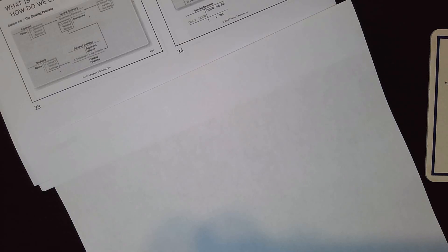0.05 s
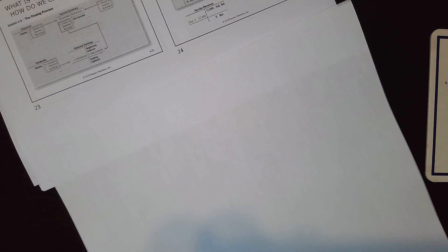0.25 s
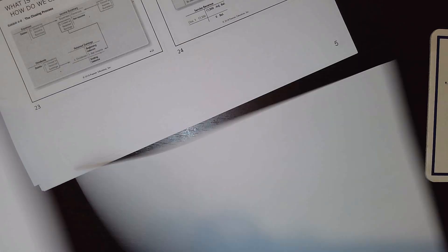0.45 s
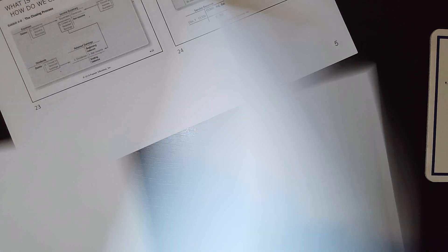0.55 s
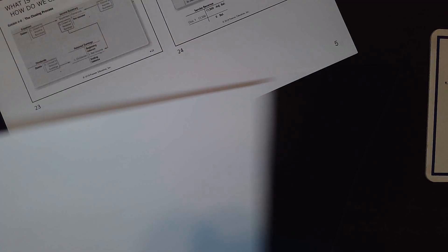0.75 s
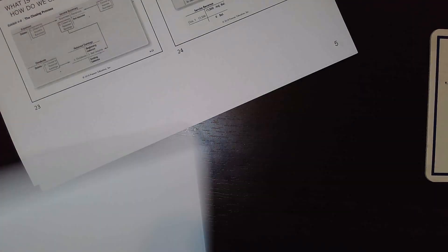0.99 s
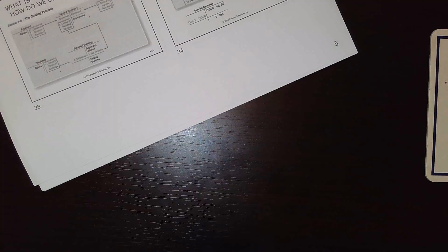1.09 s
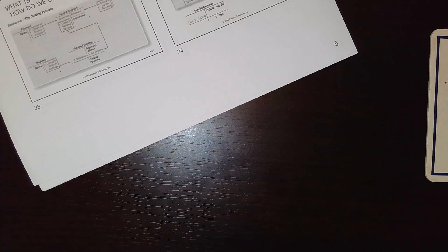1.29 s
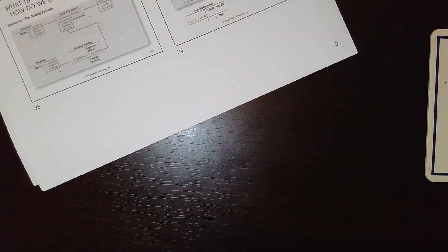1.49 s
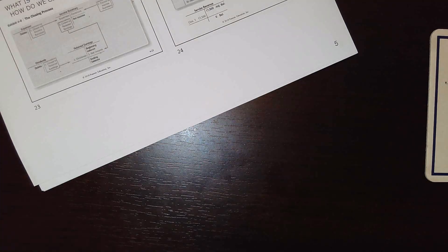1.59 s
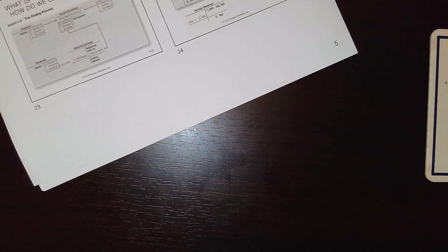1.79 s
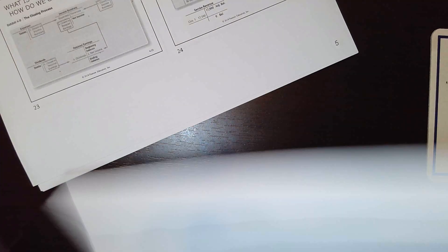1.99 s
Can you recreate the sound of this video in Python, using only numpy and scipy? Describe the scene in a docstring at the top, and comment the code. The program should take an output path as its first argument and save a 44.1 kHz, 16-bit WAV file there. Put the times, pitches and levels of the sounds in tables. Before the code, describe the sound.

Paper sheets rustle and slide across a wooden desk, with one very loud sharp snap early on.

```python
"""Sheets of paper are lifted, slid and set down on a wooden desk, close to a small microphone in a quiet room.
It starts with faint rustles and small snaps; at 0.2 s the hiss grows, and a very loud snap follows at 0.45 s.
Another snap and knock come at 0.54 s, then softer sliding, a snap at 1.12 s and a strong burst near 1.45 s.
After that the rustling fades to scattered small sounds. Filtered noise makes the friction hiss, the rustle
and the room; decaying sine tones make the snaps of the buckling paper, the desk knocks and the soft thumps."""
import sys
import numpy as np
from scipy import signal
from scipy.fft import rfft, irfft
from scipy.io import wavfile
from scipy.ndimage import uniform_filter1d

SR = 44100
rng = np.random.default_rng(int(sys.argv[2]) if len(sys.argv) > 2 else 0)


def unload_audio(sound):
    """Save the sound as a 16-bit wav file, at the path given as the first command line argument."""
    columns = np.transpose(np.atleast_2d(sound))
    # keep every value between -1 and 1, then stretch to whole-number steps
    steps = np.round(np.clip(columns, -1, 1) * 32767)
    wavfile.write(sys.argv[1], SR, steps.astype(np.int16))


N = 90404


def amp(db):
    """Turns decibels into a plain multiplier."""
    return 10 ** (np.asarray(db) / 20)


def evened(x):
    """Scales a signal to an average (RMS) strength of 1."""
    return x / np.sqrt(np.mean(x ** 2) + 1e-20)


def read(points, hz):
    """Reads a table between its points, along a logarithmic pitch scale."""
    f, value = np.transpose(points)
    return np.interp(np.log(hz + 1), np.log(f + 1), value)


def add(mix, s, sound):
    """Mixes a sound in, starting at s seconds."""
    part = mix[round(s * SR):][:len(sound)]
    part += sound[:len(part)]


def colour(x, spectrum):
    """Filters by a spectrum table, falling away steeply below its first point, and evens the strength."""
    hz = np.fft.rfftfreq(len(x), 1 / SR)
    low_cut = np.minimum(hz / spectrum[0][0], 1) ** 2
    return evened(irfft(rfft(x) * amp(read(spectrum, hz)) * low_cut, len(x)))


def grains(per_s, spread_db):
    """Dense tiny slips of random sign; a few are large."""
    size = amp(spread_db * np.minimum(rng.exponential(1, N), 4))
    happens = rng.random(N) < per_s / SR
    return size * rng.standard_normal(N) * happens


# How the paper is handled, one list per stretch. Each row: time in seconds, level of the sliding hiss in dB,
# its top end in dB (TOP_REF_DB is neutral), level of the duller flexing rustle in dB,
# rumble through the desk in dB before RUMBLE_DB is added.
STROKES = [
    [(0.0, -78, -6, -77, -70), (0.01, -83, -7, -70, -75), (0.018, -51.5, -7, -57, -72),
     (0.046, -56, -6, -66, -66), (0.058, -56.5, -9, -58, -64), (0.12, -55, -5.5, -62.5, -61),
     (0.148, -50, -8.5, -73, -46), (0.156, -49.5, -3, -52.5, -46), (0.18, -45.5, -5.5, -65, -48),
     (0.2, -43.5, -4, -59, -54)],
    [(0.22, -44.5, -4, -46.5, -32), (0.24, -37, -10, -32.5, -40), (0.25, -41, -6.5, -42, -37),
     (0.272, -43, -7, -46.5, -46), (0.29, -36, -5.5, -44, -47), (0.31, -48, -7.5, -49.5, -48),
     (0.332, -46.5, -8.5, -61, -43), (0.358, -45, -9.5, -55, -69), (0.388, -41, -8.5, -50.5, -44),
     (0.44, -40.5, -9, -52, -60)],
    [(0.465, -33, -8, -40, -50), (0.481, -41.5, -8, -35, -43), (0.525, -45.5, -9, -39.5, -44)],
    [(0.548, -34.5, -13, -27.5, -33.5), (0.59, -54.5, -12, -41.5, -42), (0.606, -64, -27, -40.5, -42),
     (0.624, -49.5, -7.5, -43, -52), (0.66, -52, -10, -51, -69), (0.67, -40.5, -6.5, -52, -53),
     (0.702, -32.5, -6.5, -50, -56), (0.718, -42, -9, -66, -45), (0.752, -45, -8.5, -52.5, -40),
     (0.8, -44.5, -7, -55, -46)],
    [(0.81, -51.5, -9, -63, -52), (0.858, -55.5, -8.5, -56, -62), (0.894, -54, -8, -62, -75),
     (0.966, -65, -5, -57, -55), (0.996, -51.5, -6, -81, -66), (1.036, -51.5, -4, -79, -65),
     (1.058, -56.5, -3, -53, -40), (1.076, -54, -8, -61, -48), (1.092, -37, -11.5, -44, -38),
     (1.108, -41.5, -8.5, -54, -60)],
    [(1.128, -37.5, -3, -36.5, -50), (1.146, -44.5, -10, -49, -48), (1.156, -43.5, -6, -43, -42),
     (1.17, -46, -8, -51.5, -43.5), (1.264, -68, -8, -63, -70), (1.318, -65, -7, -66, -62),
     (1.332, -52, -6, -58, -70), (1.34, -56.5, -7, -74, -72), (1.374, -60.5, -9, -80, -73),
     (1.418, -60, -11, -83, -59.5)],
    [(1.434, -37.5, -6, -38, -38), (1.452, -16, -7, -28, -33), (1.46, -29.5, -9, -36, -28),
     (1.496, -31.5, -7, -43.5, -45), (1.55, -42.5, -8.5, -47, -51.5), (1.572, -35.5, -6.5, -47.5, -56),
     (1.602, -43.5, -7.5, -56, -45), (1.67, -48, -6, -53.5, -45), (1.688, -49.5, -4, -70, -64),
     (1.72, -49, -4.5, -52, -73)],
    [(1.745, -56, -3, -63, -70), (1.753, -54, -8, -46, -70), (1.767, -79, 0, -78, -55),
     (1.823, -83, -6, -75, -66), (1.833, -54.5, 4, -55.5, -61), (1.849, -80, 0, -66, -55),
     (1.857, -59, -4, -55.5, -59), (1.871, -68, -2, -54.5, -49), (1.917, -69, -2, -64.5, -60),
     (1.93, -84, -10, -65, -54)],
    [(1.948, -49, -9, -58, -38), (1.962, -53, -3, -58, -50), (1.974, -45, -5, -63, -48),
     (1.978, -50, -5, -70, -54), (1.99, -47.5, -5.5, -62, -53), (2.018, -51.5, -5, -57.5, -46),
     (2.026, -50, -7, -75, -60), (2.05, -68.5, -3, -56, -59)],
]
# Each number: time in seconds where one stretch gives way at once to the next.
CONTACTS = [0.2124, 0.454, 0.5385, .805, 1.1182, 1.4291, 1.733, 1.9388]


def handling():
    """Joins the stretches: each level holds until the contact that starts the next."""
    rows = list(STROKES[0])
    for s, stroke in zip(CONTACTS, STROKES[1:]):
        rows.append((s - .001, *rows[-1][1:]))
        rows.append((s, *stroke[0][1:]))
        rows += list(stroke)
    return np.array(rows).T


# Colour of the sliding hiss. Each row: frequency in Hz, relative strength in dB per Hz.
HISS = [(880, -51), (1500, -6.5), (1580, -28.5), (2050, -9), (2620, -10.5), (2830, -3.5), (3470, -4),
        (5040, 1), (8960, 3.5), (15500, -4)]
GRAINS_PER_S, GRAIN_DB = 25000, 1.  # how many slips, and how much their sizes spread
# The tilt turns about a point near TOP_HZ; TOP_SLOPE is dB per octave for each dB of top end.
TOP_HZ, TOP_REF_DB, TOP_SLOPE = 8330, -6.5, 2.01
PATCH_DB, FLUTTER_DB = 1, 1.94  # random unevenness: in patches of time and pitch, and of the whole hiss


def friction_hiss(s, hiss_db, top_db):
    """Fibres catch on the surface below in countless tiny slips, making a bright, uneven hiss."""
    slips = colour(grains(GRAINS_PER_S, GRAIN_DB), HISS)
    hz, t, z = signal.stft(slips, SR, nperseg=256, noverlap=192)
    patches = rng.standard_normal(z.shape)
    patches = uniform_filter1d(patches, size=6, axis=0)  # smooth over pitch
    patches = evened(uniform_filter1d(patches, size=14, axis=1))  # smooth over time
    flutter = evened(uniform_filter1d(rng.standard_normal(len(t)), size=4))
    octaves = np.log2((hz + 500) / TOP_HZ)[:, None]
    tilt = octaves * TOP_SLOPE * (np.interp(t, s, top_db) - TOP_REF_DB)
    z = z * amp(np.clip(tilt, -15, 15) + PATCH_DB * patches + FLUTTER_DB * flutter)
    uneven = signal.istft(z, SR, nperseg=256, noverlap=192)[1][:N]
    return uneven * amp(np.interp(np.arange(N) / SR, s, hiss_db))


# Colour of the flexing rustle. Each row: frequency in Hz, relative strength in dB per Hz.
FLEX = [(150, -88), (250, 5), (393, -1.5), (544, 6), (792, 1.5), (1450, 4), (1930, 5), (3650, -1),
        (5000, -13.5), (6500, -12), (11000, -120)]
FLEX_PER_S, FLEX_GRAIN_DB = 9000, 1.2  # how many slips, and how much their sizes spread


def flexing_rustle(s, flex_db):
    """The flexing sheet gives a duller rustle, made of sparser tiny slips."""
    rustle = colour(grains(FLEX_PER_S, FLEX_GRAIN_DB), FLEX)
    return rustle * amp(np.interp(np.arange(N) / SR, s, flex_db))


# Colour of the desk rumble. Each row: frequency in Hz, relative strength in dB per Hz.
RUMBLE = [(25, 3), (60, -3.5), (160, -2.5), (260, -17), (400, -24), (1000, -49)]
RUMBLE_DB = -6  # added to every rumble level


def desk_rumble(s, rumble_db):
    """Sliding shakes the desk: low noise follows the strokes."""
    rumble = colour(rng.standard_normal(N), RUMBLE)
    return rumble * amp(np.interp(np.arange(N) / SR, s, rumble_db) + RUMBLE_DB)


def sliding():
    """Friction hiss, flexing rustle and desk rumble all follow the same handling of the paper."""
    s, hiss_db, top_db, flex_db, rumble_db = handling()
    return friction_hiss(s, hiss_db, top_db) + flexing_rustle(s, flex_db) + desk_rumble(s, rumble_db)


# Snaps of the buckling sheet. Each row: start in seconds, peak in dB before SNAP_DB is added,
# centre of colour in Hz, spread in octaves, time in seconds for the crackle to fall by 60 dB.
SNAPS = [(0.019, -29.5, 6600, 0.93, 0.0023), (0.0275, -35, 7500, 1.1, 0.006),
         (0.0557, -36, 5670.0, 1.1, 0.0054), (0.0625, -35, 6360.0, 1, 0.006),
         (0.0684, -38.9, 6790.0, 0.79, 0.006), (0.0764, -40, 5330.0, 1.17, 0.0072),
         (0.0808, -46, 4930.0, 1.1, 0.0051), (0.213, -22.5, 1420.0, 1.4, 0.0091),
         (0.2265, -22.5, 2060, 1.48, 0.0042), (0.236, -20.5, 1520, 1.15, 0.0046),
         (0.2402, -29.5, 2730.0, 1.2, 0.006), (0.2595, -27, 3250, 1.2, 0.013),
         (0.2818, -20, 8270.0, 0.86, 0.0051), (0.2888, -21, 8200, 0.77, 0.0054),
         (0.43, -31, 4830.0, 1.35, 0.0072), (0.4541, 1.2, 5370, 1, 0.0078),
         (0.5379, -11.5, 2460, 0.91, 0.0063), (0.558, -18.3, 1790.0, 0.66, 0.0048),
         (0.9577, -46, 2040, 1.71, 0.0054), (1.0521, -36, 5160.0, 1.2, 0.0052),
         (1.0898, -27.5, 5050.0, 1.2, 0.0076), (1.119, -18.5, 6350, 1.16, 0.0044),
         (1.1199, -15, 5200, 1, 0.0067), (1.1274, -25.5, 4040.0, 1.7, 0.0082),
         (1.1529, -28.5, 3720, 1.3, 0.0079), (1.1625, -36, 4200.0, 1.64, 0.0051),
         (1.1827, -32, 2130, 1.8, 0.0051), (1.4309, -33, 3320.0, 1.1, 0.0046),
         (1.436, -25, 7340, 0.93, 0.0047), (1.4383, -9, 5200, 1.3, 0.0093),
         (1.446, -8.5, 8750, 0.65, 0.0039), (1.45, -13.5, 6200, 1.6, 0.012),
         (1.6505, -38.5, 2360, 2.2, 0.006), (1.731, -26.5, 2350, 0.96, 0.006),
         (1.7519, -39.5, 2720, 0.64, 0.0048), (1.8335, -40, 9460.0, 1.18, 0.0055),
         (1.8591, -27, 700.0, 0.47, 0.0051), (1.8711, -33.5, 860, 0.28, 0.018),
         (1.8791, -35, 1830, 0.2, 0.0079), (1.9413, -32.5, 2700.0, 2.1, 0.0021)]
# Tones the sheet briefly rings with. Each row: frequency in Hz, relative level in dB,
# time in seconds to fall by 60 dB.
SHEET = [(570, -1, 0.004), (945, -12.5, 0.0059), (1160, 0.5, 0.0075), (1620, -2, 0.0046),
         (2355, -1, 0.0057), (3770, -1, 0.0023), (4440, 2, 0.0033), (6660, 11, 0.0023), (8800, 1, 0.0042),
         (11430, 2.5, 0.0054), (14500, -22, .003)]
CLICK_SHARE, SNAP_DB = 3.82, -0.5  # size of the first click beside the crackle; level added to every snap


def snaps():
    """A click and a dying crackle ring the modes of the sheet near the centre of colour."""
    out, t = np.zeros(N), np.arange(3000) / SR
    noise = rng.standard_normal((len(SNAPS), len(t)))
    for (s, db, centre_hz, octaves, crackle_t60), crackle in zip(SNAPS, noise):
        ring = np.zeros(len(t))
        for k, (hz, mode_db, t60) in enumerate(SHEET):
            away = np.log2(hz / centre_hz) / max(octaves, .3)
            level = amp(mode_db - 10 * away ** 2 - 60 * t / t60)
            ring += (-1) ** k * level * np.sin(2 * np.pi * hz * t)
        drive = crackle * amp(-60 * t / max(crackle_t60, .001))
        drive[0] = CLICK_SHARE
        sound = signal.fftconvolve(drive, ring)[:len(t)]
        add(out, s, amp(db + SNAP_DB) * sound / abs(sound).max())
    return out


# Snaps that also knock the desk top. Each row: time in seconds, peak in dB, softness of the push in seconds.
KNOCKS = [(0.2124, -28, 0.00034), (.2267, -27.5, 0.0005), (0.2377, -26.5, 0.00029), (0.4538, -14, 0.00019),
          (0.5386, -12.5, 0.00015), (0.5473, -27, 0.00023), (1.052, -39.5, 0.00062),
          (1.1205, -30.5, 0.0003), (1.156, -35.5, 0.00047), (1.181, -41, 0.00041), (1.44, -34.5, 0.00049),
          (1.4521, -21.5, 0.00027), (1.653, -36.5, 0.00032), (1.877, -39, .0005), (1.886, -38, 0.00033),
          (1.9413, -36.5, 0.00033)]
# Tones of the desk top. Each row: frequency in Hz, relative level in dB, time in seconds to fall by 60 dB.
DESK = [(562, -7, 0.023), (687, -3, 0.012), (1117, 3.5, 0.017), (1355, 5.5, 0.014), (1705, 5.5, 0.035),
        (2360, -3, 0.012), (3700, -24, .012)]


def knocks():
    """A short rounded push rings the desk top; softer pushes favour its low modes."""
    out, t = np.zeros(N), np.arange(3000) / SR
    ring = np.zeros(len(t))
    for k, (hz, db, t60) in enumerate(DESK):
        ring += (-1) ** k * amp(db - 60 * t / t60) * np.sin(2 * np.pi * hz * t)
    for s, db, soft in KNOCKS:
        push = np.exp(-(t[:200] / soft - 2) ** 2)
        sound = signal.fftconvolve(push, ring)
        add(out, s - 2 * soft, amp(db) * sound / abs(sound).max())  # the push is strongest at s
    return out


# Soft thumps through the desk and puffs of air. Each row: start in seconds, level in dB of the swing
# before its rise and decay, pitch in Hz, time in seconds to fall by 60 dB.
THUMPS = [(0.149, -36, 40, .06), (.208, -29.5, 75, 0.1), (.236, -28, 80, 0.077), (.43, -30, 122, 0.062),
          (0.537, -43, 58.7, 0.066), (.708, -34.5, 150, 0.049), (1.054, -38, 45.3, 0.11),
          (1.165, -31.5, 40.2, .06), (1.45, -30.5, 73, 0.06), (1.5, -32.5, 34.8, 0.085),
          (1.574, -32.5, 50.3, 0.045), (1.649, -29.5, 78, 0.042), (1.855, -44, 90.5, 0.027)]
THUMP_RISE_S, THUMP_NOISE = 0.001, 0.22  # rise in seconds; share of rumble beside the swing


def thumps():
    """A low damped swing with a little rumble."""
    out, t = np.zeros(N), np.arange(12000) / SR
    noise = rng.standard_normal((len(THUMPS), len(t)))
    band = signal.butter(2, [40, 350], "band", fs=SR, output="sos")
    for (s, db, hz, t60), n in zip(THUMPS, noise):
        rumble = evened(signal.sosfilt(band, n))
        swing = -np.sin(2 * np.pi * hz * t)
        shape = (1 - np.exp(-t / THUMP_RISE_S)) * amp(db - 60 * t / max(t60, .01))
        add(out, s, shape * (swing + THUMP_NOISE * rumble))
    return out


# How long reflections last. Each row: frequency in Hz, time in seconds to fall by 60 dB.
TAIL = [(300, 0.55), (1500, 0.51), (5000, 0.42), (12000, 0.29)]
TAIL_DB = -15.5  # strength of the reflections


def tail(x):
    """Reflections of the room, each band dying at its own speed."""
    n = np.arange(SR // 2)
    taps = rng.standard_normal(len(n)) * (n > 200)  # a short gap comes before the reflections
    hz, t, z = signal.stft(taps, SR, nperseg=256)
    decay = amp(-60 * t / read(TAIL, hz)[:, None])
    h = signal.istft(z * decay, SR, nperseg=256)[1]
    return amp(TAIL_DB) * signal.fftconvolve(x, h / np.linalg.norm(h))[:N]


# Colour of the quiet room. Each row: frequency in Hz, relative strength in dB per Hz.
ROOM = [(12, -34), (20, 14.5), (122, -4), (157, 0), (225, -1), (323, -12), (857, -17), (1200, -16.5),
        (1410, -21.5), (1920, -22), (2090, -20.5), (6910, -20.5), (15500, -34)]
ROOM_DB = -52  # average (RMS) level


def room_noise():
    """The quiet room: steady noise, strongest in the bass."""
    return amp(ROOM_DB) * colour(rng.standard_normal(N), ROOM)


def scene():
    """Mixes all layers; only the snaps and knocks get reflections."""
    hits = snaps() + knocks()
    return (sliding() + hits + thumps() + tail(hits) + room_noise())[None]


EDGE_HZ = 15700  # top of the band


def record(dry):
    """Clips at full scale, then the band limit."""
    low_pass = signal.firwin(511, EDGE_HZ, window=("kaiser", 9), fs=SR)
    return signal.oaconvolve(np.clip(dry, -1, 1), low_pass[None], "same")


dry = scene()
out = record(dry)
unload_audio(out)
```